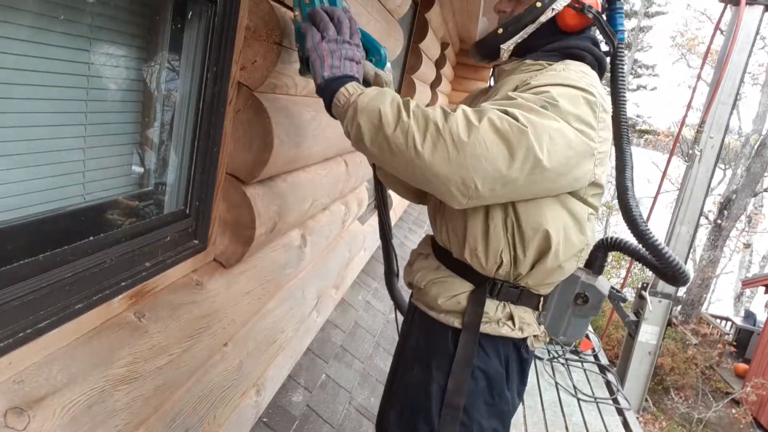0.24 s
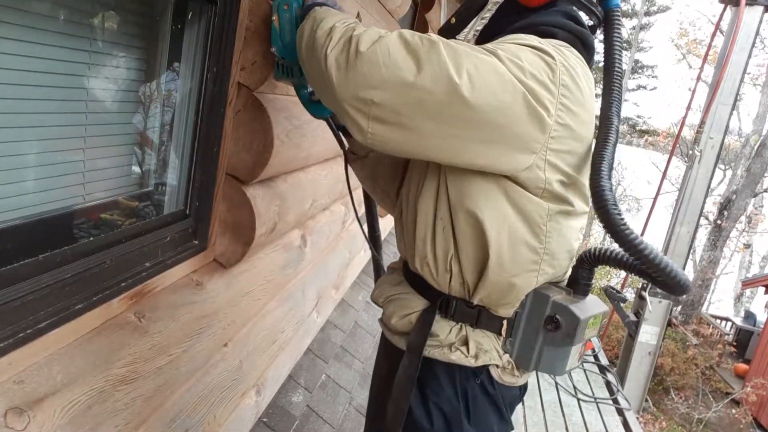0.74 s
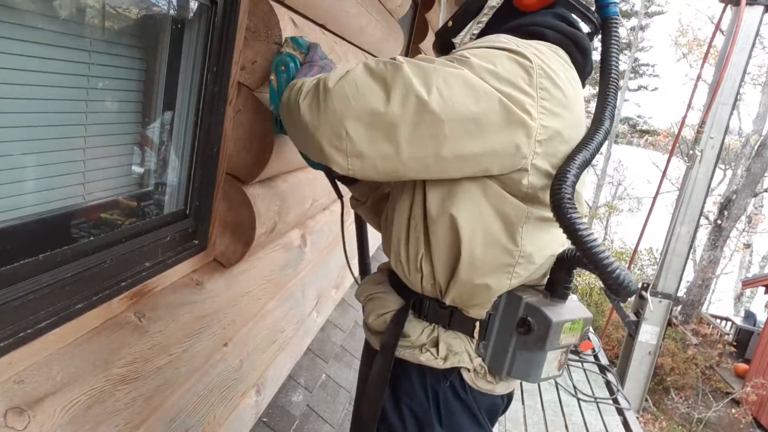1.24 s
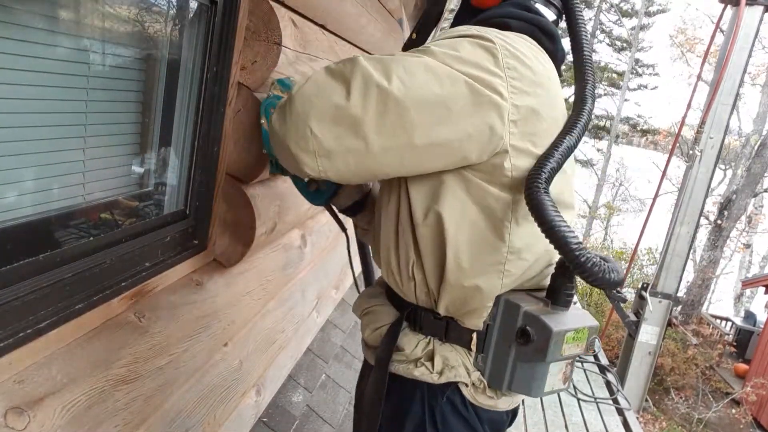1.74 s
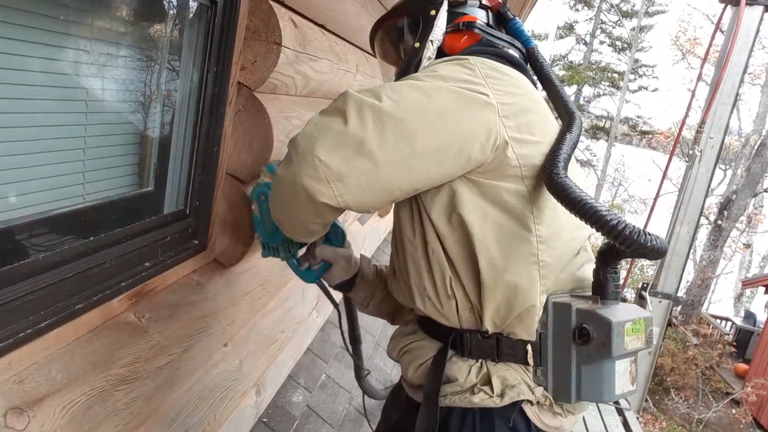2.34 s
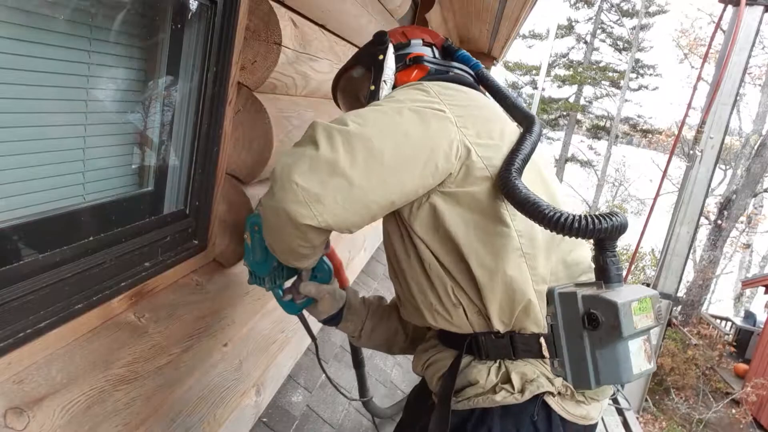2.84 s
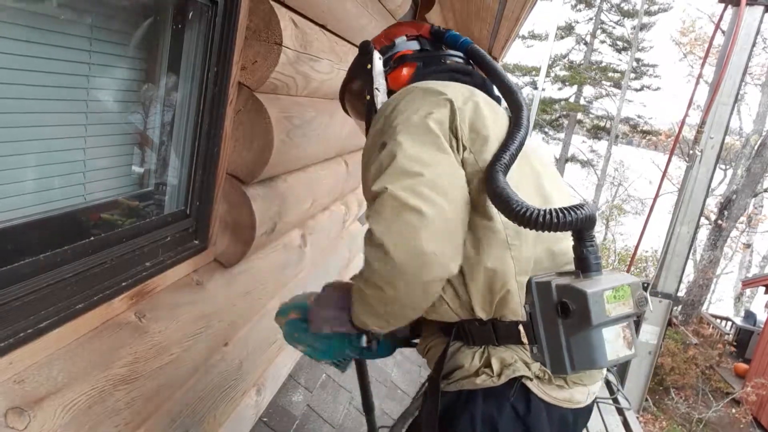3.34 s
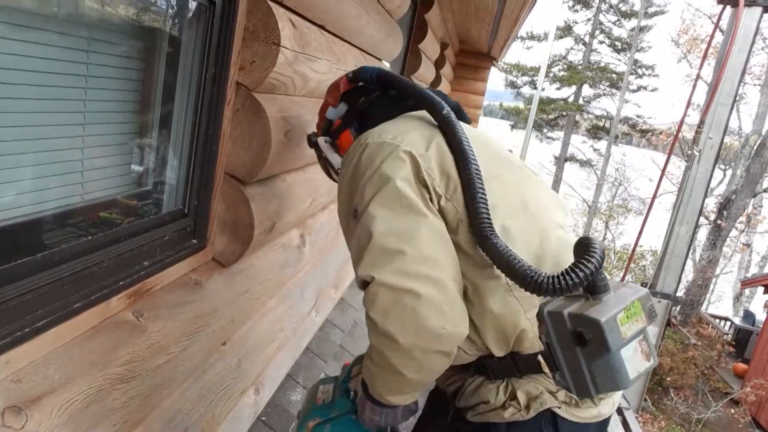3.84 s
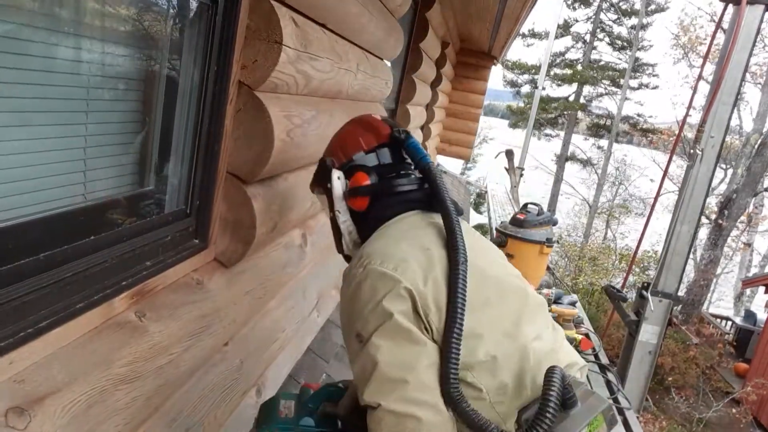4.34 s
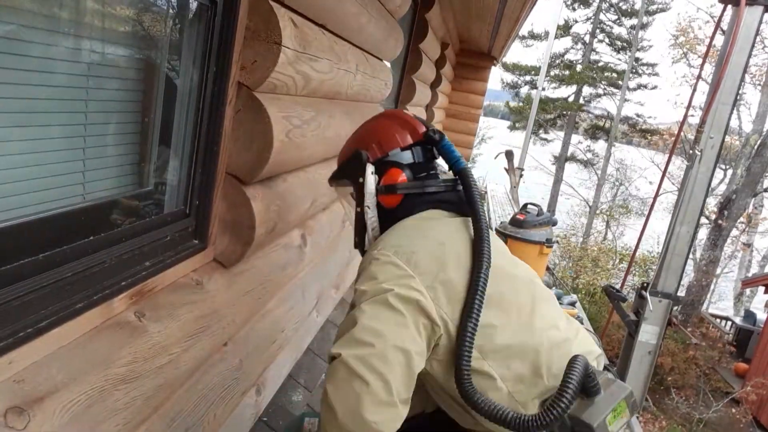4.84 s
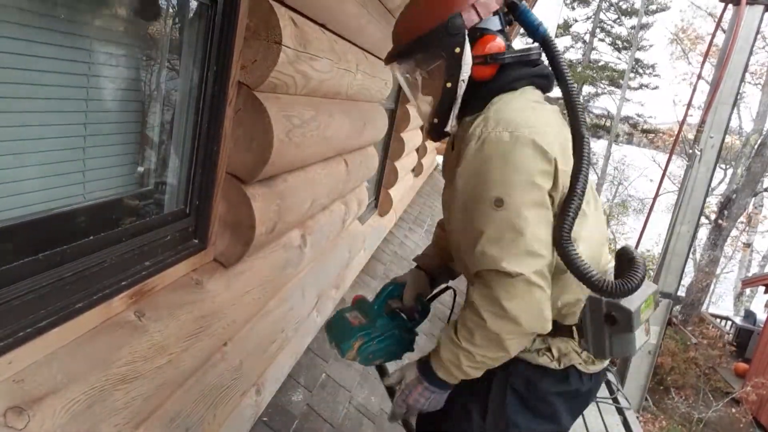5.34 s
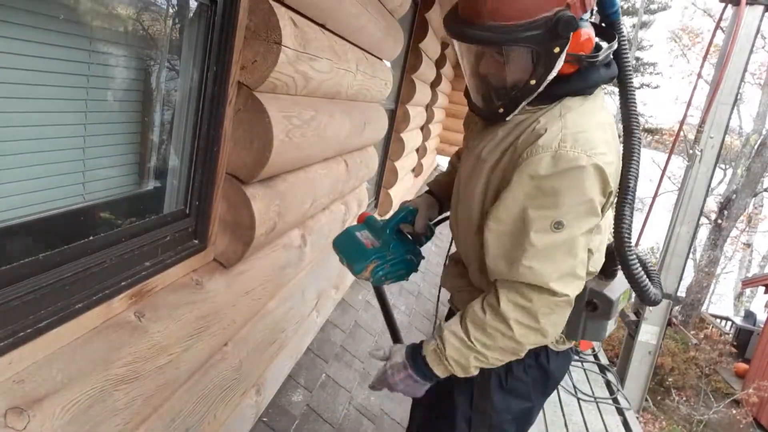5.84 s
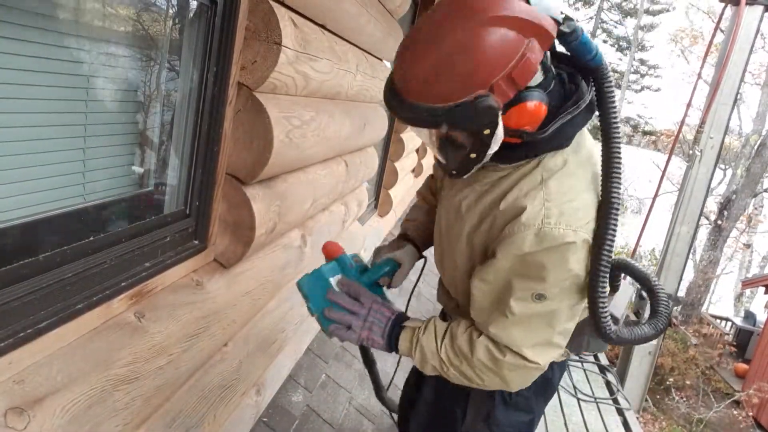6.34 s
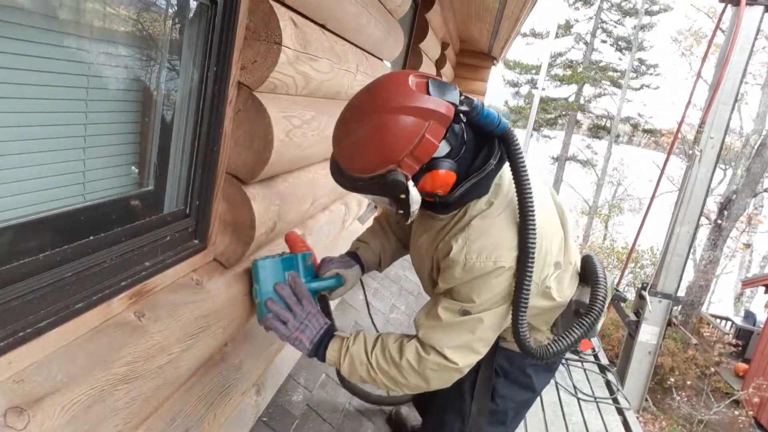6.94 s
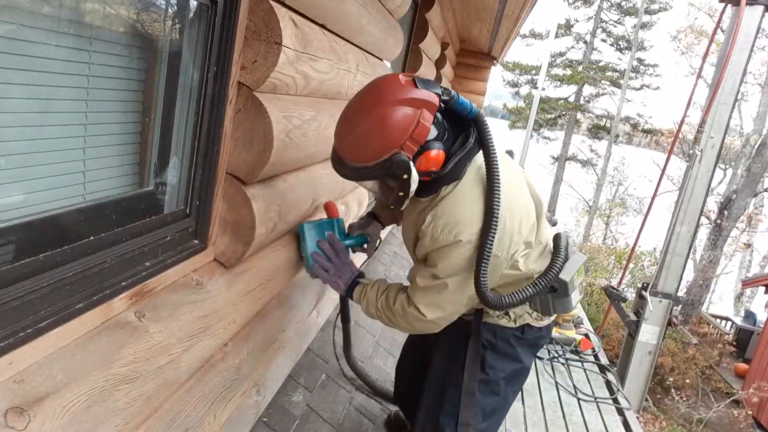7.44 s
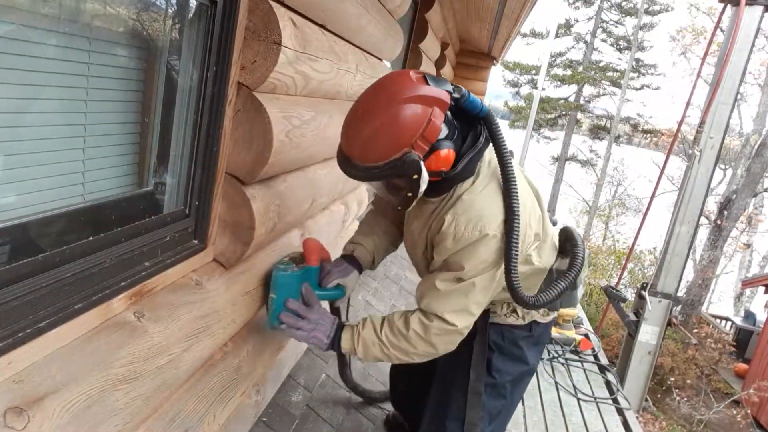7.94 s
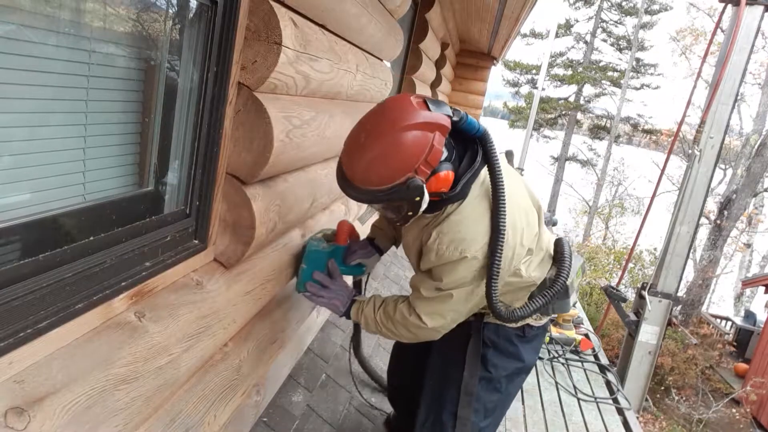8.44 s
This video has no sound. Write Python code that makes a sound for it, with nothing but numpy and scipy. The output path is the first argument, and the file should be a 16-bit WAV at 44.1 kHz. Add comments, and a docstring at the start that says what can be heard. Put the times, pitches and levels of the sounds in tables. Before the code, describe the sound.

An electric drum sander is already running at 0 s, loud and close, outdoors beside a log wall under eaves. Its fast whine and airy rush mix with a gritty rasp. Two soft, dull knocks come near 0.5 and 0.6 s, then the motor sags around 1 s, recovers by 1.6, dips near 2.1, rises about 2.6 and sinks again at 3.1 s with another low bump. Each press brings singing gears, a rough drone and a woody growl. From about 3.4 s it lifts off: pitch climbs, the rasp thins and fan air dominates, brightest around 5.5 s. Near 6.8 s it bites the wood again; the whine drops steeply to a low about 7.5 s, then wavers upward with harsh rasp, ringing guard and a gear rattle around 8 s. A faint extractor hum and airy draught persist throughout. Reflections are short and dry; it ends still sanding at about 8.7 s.

```python
"""Drum sander on a log wall

An electric drum sander works along the log wall of a cabin, outdoors under the eaves.
Tables slow its motor shaft when it is pressed on the wood: the gears whine and the drum rasps.
Lifted, it speeds up and its fan rushes. One shaft turns the fan, gears and drum together.
Behind it, a dust extractor hums with steady tones and a band of airy noise."""
import sys
import numpy as np
from scipy import signal
from scipy.fft import irfft, next_fast_len
from scipy.io import wavfile
from scipy.ndimage import uniform_filter1d

SR = 44100
rng = np.random.default_rng(int(sys.argv[2]) if len(sys.argv) > 2 else 0)


def log_audio(samples):
    """Write samples as a 16-bit WAV file to the path given in sys.argv[1]."""
    # one column per channel
    frames = np.atleast_2d(samples).T
    # limit to full scale, then quantise
    limited = np.clip(frames, -1, 1)
    pcm = np.round(limited * 32767).astype(np.int16)
    wavfile.write(sys.argv[1], SR, pcm)


N = 383654
TIME = np.arange(N) / SR
FRAME, HOP = 1024, 256  # samples in each short slice of noise, and between slices
FRAME_TIME = np.arange(N // HOP + 5) * HOP / SR
BIN_HZ = np.fft.rfftfreq(FRAME, 1 / SR)
PINION_TEETH, DRUM_TEETH, FAN_BLADES = 7, 55, 12


def amp(db):
    """Turns decibels into a gain."""
    return 10 ** (np.asarray(db) / 20)


def evened(x):
    """Scales a signal to an average (rms) strength of 1."""
    return x / np.sqrt(np.mean(x ** 2) + 1e-20)


def follow(rows, t=TIME):
    """Reads the columns of a curve table at times t, with straight lines between rows."""
    start_s, *columns = np.transpose(rows)
    return [np.interp(t, start_s, column) for column in columns]


def read(points):
    """Reads a spectrum table at every frequency bin, joined on a log-frequency axis."""
    hz, value = np.transpose(points)
    return np.interp(np.log(BIN_HZ + 1), np.log(hz), value)


def wander(rate_hz):
    """A smooth random curve of rms 1 that moves at up to about rate_hz."""
    hz = np.fft.rfftfreq(next_fast_len(N), 1 / SR)
    a, b = rng.standard_normal((2, len(hz)))
    spectrum = (a + 1j * b) / (1 + (hz / rate_hz) ** 4)
    return evened(irfft(spectrum)[:N])


def patches(frames_order, bins_order):
    """Random patches of rms 1, smoothed over time (frames) and frequency (bins)."""
    field = rng.standard_normal((len(FRAME_TIME), len(BIN_HZ)))
    over_time = uniform_filter1d(field, frames_order, 0)
    return evened(uniform_filter1d(over_time, bins_order, 1))


def ringing(hz, width_hz):
    """A resonance shaken at random, its centre following the curve hz."""
    shake = wander(width_hz) + 1j * wander(width_hz)
    return (shake * np.exp(2j * np.pi * np.cumsum(hz) / SR)).real


# how far the left microphone port leads the right, as the sander moves: start_s, lead_ms
BEARING = [(0, 0.16), (3.1, 0.18), (3.7, 0.084), (4.6, 0.12), (5.5, 0.065), (6.2, 0.16), (7.1, 0.11)]


def ports(x, share=1):
    """Sound reaches the left port first, by a share of the full lead."""
    lead_s = follow(BEARING)[0] / 1000
    return np.array([np.interp(TIME + share * lead_s, TIME, x), x])


# how alike noise is at the two microphone ports: pitch_hz, likeness (0-1)
LIKENESS = [(100, 1), (400, 0.83), (1000, 0.82), (2000, 0.76), (4000, 0.52), (10000, 0)]


def noise(colour_db, shading_db=0, ahead=0.36):
    """Coloured noise, partly alike at both ports; a share (ahead) of the alike part has no lead."""
    a, b, c, d = rng.standard_normal((4, len(FRAME_TIME), len(BIN_HZ)))
    lead_s = follow(BEARING, FRAME_TIME)[0][:, None] / 1000
    right = a + 1j * b
    link = read(LIKENESS) * (ahead + (1 - ahead) * np.exp(2j * np.pi * BIN_HZ * lead_s))
    unlike = np.sqrt(np.maximum(1 - abs(link) ** 2, 0)) * (c + 1j * d)
    left = link * right + unlike
    slices = np.array([left, right]) * amp(colour_db + shading_db)
    sound = signal.istft(slices.transpose(0, 2, 1), nperseg=FRAME, noverlap=FRAME - HOP)[1]
    return evened(sound[:, :N])


# steady tones of the dust extractor, before the screening: pitch_hz, level_db
EXTRACTOR = [(391.3, -31.5), (296.7, -45), (120.5, -63.5), (1462, -36)]
# the worker's body screens the extractor's hum: start_s, change_db
SCREEN = [(0, -3), (.55, 2), (.9, -5.5), (3, -7.5), (3.6, -5.5), (5.6, 1), (6.5, 0), (7.3, -2.5),
          (8.7, -5.5)]
# colour of the extractor's air, relative levels: pitch_hz, level_db (per Hz)
DRAUGHT = [(25.0, -37), (80.0, -15.5), (160.0, -18), (220.0, 0), (290.0, 2), (340.0, -4.5), (700.0, 8.5),
           (2000.0, -12), (8000.0, -41)]


def extractor(draught_db=-37.0, waver_db=2.0, drift=0.0015):
    """A suction motor hums on slightly drifting tones, over the noise of its moving air."""
    clock = np.cumsum(1 + drift * wander(7.1)) / SR
    hum = 0
    for hz, db in EXTRACTOR:
        hum = hum + amp(db + waver_db * wander(4.2)) * np.sin(2 * np.pi * hz * clock)
    air = amp(draught_db) * noise(read(DRAUGHT))
    return np.sqrt(2) * hum * amp(follow(SCREEN)[0]) + air


def eaves(x, wet_db=-9, t60=0.16):
    """The direct tone, then a short scatter from logs, deck and roof, fading 60 dB in t60 seconds."""
    t = TIME[:SR // 4]
    taps = rng.standard_normal((2, len(t))) * amp(-60 * t / t60)
    taps = taps / np.linalg.norm(taps[0])
    scatter = signal.fftconvolve(x[None], taps, axes=1)[:, :N]
    return (ports(x, 0.49) + amp(wet_db) * scatter) / np.hypot(1, amp(wet_db))


# echo off the log wall: start_s, delay_ms, strength (0-1)
WALL = [(0, 2.3, 0.1), (.75, 2.53, 0.36), (1.1, 1.8, 0), (1.45, 1.93, 0.3), (1.85, 1.42, .45),
        (2.15, 1.43, 0.22), (3.1, 1.28, 0.1), (6.3, 2.1, 0), (7.15, 1.78, .3), (8, 1.82, 0.34)]


def wall_db(scatter_hz=2500):
    """The wall's echo boosts and cuts the noise like a comb; round logs scatter its treble away."""
    delay_ms, strength = follow(WALL, FRAME_TIME[:, None])
    turn = np.exp(2j * np.pi * BIN_HZ * delay_ms / 1000)
    echo = turn * strength / (1 + (BIN_HZ / scatter_hz) ** 2)
    return 20 * np.log10(abs(1 + echo))


# a moving dip (or, above 0 dB, a bump) in the colour of the noise: start_s, pitch_hz, change_db
HOLLOW = [(.5, 510, -6.5), (.9, 950, -0.5), (1.9, 900, -6), (3.1, 460, 0), (3.6, 470, -8), (4.2, 510, -9),
          (4.8, 850, -5), (5.05, 550, -5), (5.9, 607, -2), (6.5, 620, 4)]


def hollow_db(width_hz=130):
    """A dip or bump that moves through the low end of the noise as the tool is swung."""
    hz, db = follow(HOLLOW, FRAME_TIME[:, None])
    return db / (1 + (2 * (BIN_HZ - hz) / width_hz) ** 2)


# hollows of the tool's housing that colour its noise: pitch_hz, width_hz, boost_db
HOUSING = [(717, 48, 7), (944, 57, 5), (1252, 71, 2.5), (1678, 21, 4.5), (1910, 140, 2.5)]


def housing_db():
    """Hollows in the tool's shell resonate and put peaks on its noise."""
    return sum(db / (1 + (2 * (BIN_HZ - hz) / width) ** 4) for hz, width, db in HOUSING)


# the tool bumps the wall: start_s (moment of the peak), level_db, pitch_hz (centre)
BUMPS = [(0.487, -39, 150), (.63, -42, 150), (3.086, -37, 191.3)]


def bumps(decay=0.0058, spread_hz=70):
    """Short, dead knocks on the heavy wall: bands of noise that swell and die in milliseconds."""
    shake = wander(spread_hz) + 1j * wander(spread_hz)
    knocks = 0
    for start_s, db, hz in BUMPS:
        age = np.maximum(TIME - start_s + decay, 0) / decay
        knock = (shake * np.exp(2j * np.pi * hz * TIME)).real
        knocks = knocks + amp(db) * age * np.exp(1 - age) * knock
    return knocks


# colour of the cooling air, relative levels: pitch_hz, level_db (per Hz)
AIR = [(100.0, -52), (250.0, -13.5), (500.0, -3.5), (780.0, -4.5), (1050.0, 2), (2000.0, 0.1),
       (3200.0, -0.5), (4500.0, -0.5), (5400.0, -3.5), (7200.0, -4), (8400.0, -12.5), (11500.0, -13),
       (13500.0, -15), (15800.0, -21)]
# rush of the air as the vents turn toward and away: start_s, level_db
VENTS = [(0, -16.5), (.6, -14.5), (1.25, -21), (1.6, -18.5), (2.8, -19.5), (3.1, -22.5), (3.5, -18),
         (4.1, -18), (4.45, -14), (5, -16.5), (5.55, -12), (6.05, -13.5), (6.8, -17), (7.55, -21.5),
         (8.15, -21), (8.7, -23)]


def cooling_air(patchy_db=3.5, gust_db=0.7):
    """The fan's rush of air, coloured by the housing and the wall."""
    shading_db = wall_db() + hollow_db() + patchy_db * patches(frames_order=30, bins_order=3)
    level_db = follow(VENTS)[0] + gust_db * wander(44)
    return amp(level_db) * noise(read(AIR) + housing_db(), shading_db)


# fan blade tone as the vents turn toward and away: start_s, level_db
BLADES = [(0, -29), (.45, -24), (.61, -32), (.73, -23), (1.1, -39), (1.5, -26), (2.1, -39), (2.4, -31),
          (3.1, -34), (4.3, -27), (5.4, -35), (5.95, -26), (7.2, -39), (8.7, -33)]


def fan(turns, second_db=-27, fade_db=1.5, fade_hz=9, flutter_db=3):
    """Each passing blade pushes the air, giving a tone and its octave that fade and flutter."""
    phase = 2 * np.pi * FAN_BLADES * turns
    tone = np.sin(phase) + amp(second_db) * np.sin(2 * phase)
    level_db = follow(BLADES)[0] + fade_db * wander(fade_hz) + flutter_db * wander(23)
    return np.sqrt(2) * tone * amp(level_db)


# motor shaft in three presses, a free run, then a long press: start_s, speed (turns per second)
# these speeds are smoothed before use
SPEED = [(0, 379), (.6, 393), (.79, 374), (.97, 323), (1.18, 312), (1.43, 346), (1.64, 352), (2.01, 296),
         (2.21, 295), (2.45, 337), (2.72, 339), (2.91, 298), (3.07, 280), (3.32, 335), (3.81, 373),
         (4.49, 390.5), (5.6, 398.4), (6.83, 399.5), (7.07, 355.5), (7.45, 279), (7.68, 298), (8.15, 315.5),
         (8.41, 294), (8.7, 312.5)]
INERTIA_S = .14  # the rotor's mass rounds every change of speed


def shaft_hz(t=TIME):
    """Turns per second of the motor at times t, smoothed by the rotor's mass."""
    smooth = uniform_filter1d(follow(SPEED)[0], max(1, int(INERTIA_S * SR)), mode="nearest")
    return np.interp(t, TIME, smooth)


# rattle of the gear case: start_s, pitch_hz, level_db
CASE = [(1.7, 1992, -46), (2.2, 2006, -30), (3.6, 2050, -44), (7.7, 2050, -57), (8.05, 2102, -18),
        (8.7, 2010, -34)]


def gear_case(width_hz=70):
    """The gear case rattles in a fuzzy band beside the mesh tone."""
    hz, db = follow(CASE)
    return amp(db) * ringing(hz, width_hz)


def squeal(mesh_phase, order=6, peak_hz=12200, width_hz=600, peak_db=-42):
    """A high harmonic of the gears sings out as it slides through a narrow resonance."""
    off = 2 * (order * PINION_TEETH * shaft_hz() - peak_hz) / width_hz
    return amp(peak_db) / (1 + off ** 2) * np.sin(order * mesh_phase)


# gears sing under load, and their case beams the tones differently as it turns
# columns, before fading and flutter: start_s, mesh_level_db, octave_level_db
FACING = [(.55, -33, -42), (.68, -23, -34), (1, -23, -32), (1.19, -22, -24), (1.42, -34, -44),
          (1.65, -21.5, -28), (2.05, -23, -19.5), (2.43, -27, -38), (2.62, -18.5, -38), (2.79, -22.5, -28),
          (2.96, -26, -27), (3.3, -36, -42), (6.78, -38, -42), (6.94, -20.5, -42), (7.21, -21, -28),
          (7.55, -33, -28), (7.88, -22, -25), (8.25, -20.5, -23), (8.46, -28, -29.5), (8.7, -21, -24.5)]


def gears(turns, drum_turns, fade_db=1.0, runout=0.15, swing=0.074, rattle=0.15, flutter_db=1.5):
    """Teeth mesh under load; the slightly eccentric drum wheel sways their pitch and force."""
    drum = 2 * np.pi * drum_turns
    phase = 2 * np.pi * PINION_TEETH * turns + swing * np.sin(drum)
    levels_db = follow(FACING)
    tone = squeal(phase)
    # the third harmonic follows the level of the mesh tone
    tone += amp(levels_db[0]) * squeal(phase, order=3, peak_hz=7260, peak_db=-5.5)
    for harmonic, db in enumerate(levels_db, 1):
        wave = np.sin(harmonic * (phase + rattle * wander(78)))
        tone += amp(db + fade_db * wander(4.5)) * wave
    return np.sqrt(2) * tone * (1 + runout * np.cos(drum)) * amp(flutter_db * wander(94))


# growl of the log, whose resonance shifts with the place under the drum: start_s, pitch_hz, level_db
GROWL = [(0, 720, -24), (.4, 735, -27), (.6, 599.6, -27.5), (1.2, 653.8, -28.5), (1.42, 531, -39),
         (1.75, 535.6, -26), (2.05, 641.3, -26.5), (3.03, 662, -25.5), (3.6, 619.7, -46), (8.1, 616, -39.5)]


def growl(drum_turns, width_hz=75, beat=0.18):
    """The log's resonance under the drum, shaken harder once in every turn."""
    hz, db = follow(GROWL)
    shake = 1 + beat * np.cos(2 * np.pi * drum_turns)
    return amp(db) * evened(ringing(hz, width_hz) * shake)


# uneven abrasive comes round every turn: order (multiple of the drum rate), level_db (relative)
DRUM_ORDERS = [(12, 10), (13, 6.5), (17, -9), (18, -4)]
# drone of the drum, loudest when it sits flat on a log, before a trim: start_s, level_db
DRONE = [(0, -23.5), (1.2, -34), (1.65, -20.5), (2.1, -34), (2.65, -23.5), (3.8, -49), (6, -38), (7, -23),
         (7.6, -38), (8.7, -34)]
# ring of the guard, shifting with grip and press, before a trim: start_s, pitch_hz, level_db
RING = [(0, 1220, -30), (.7, 1217, -20.5), (1.1, 1102, -28), (1.7, 1048, -22.5), (2.2, 1210, -31.5),
        (5.1, 887.7, -43), (5.5, 908, -30), (6.4, 955, -31), (6.8, 1120, -24.5), (7.5, 1168, -25),
        (8.1, 1067, -20), (8.7, 1082, -27)]


def drone(drum_turns, drone_db=-3, ring_db=-3, ring_width_hz=50, blur=1.0, flutter_db=2):
    """The drum's high spots beat on the wood in a rough chord, and its guard rings."""
    chord = 0
    for order, db in DRUM_ORDERS:
        phase = 2 * np.pi * order * drum_turns + blur * wander(26.5)
        chord = chord + amp(db + flutter_db * wander(3.9)) * np.sin(phase)
    ring_hz, guard_db = follow(RING)
    ring = amp(ring_db + guard_db) * ringing(ring_hz, ring_width_hz)
    return amp(drone_db + follow(DRONE)[0]) * evened(chord) + ring


# colour of the abrasive on the log, relative levels: pitch_hz, level_db (per Hz)
RASP = [(60, -43), (150, -37.5), (230, -19), (330, -8.5), (540, -4.5), (900, -7.5), (1400, -11),
        (2000, -1.5), (2900, -16), (4200, -9.5), (8000, -32), (11000, -19.5), (15000, -29.5)]


def grit(drum_turns, count=1024):
    """The same grains come round with every turn, so part of the rasp repeats as a coarse buzz."""
    grains = rng.standard_normal(count)
    scrape = np.interp(drum_turns % 1, np.arange(count) / count, grains)
    slices = signal.stft(scrape, nperseg=FRAME)[2] * amp(read(RASP) + housing_db())[:, None]
    return ports(evened(signal.istft(slices, nperseg=FRAME)[1][:N]))


# rasp of the drum on the log, before a trim: start_s, level_db
BITE = [(0, -16), (1.2, -17), (2.2, -18), (2.6, -14), (3.1, -17), (3.6, -26), (4.3, -28), (5.6, -30),
        (6.1, -23.5), (6.8, -16), (7.55, -21.5), (8.15, -17), (8.7, -23)]
# resonances of the drum and its guard, relative levels: pitch_hz, width_hz, level_db
CHATTER = [(891, 136, 1), (1130, 156, -4)]
# chatter of the drum guard, before a trim: start_s, level_db
GUARD = [(0, -18.5), (1.15, -31), (1.6, -28), (2.7, -24.5), (3.4, -23.5), (4.1, -30), (6, -28), (6.7, -19),
         (7.5, -24.5), (8.1, -18)]


def sanding(drum_turns, rasp_db=-2.0, chatter_db=-2, beat=0.16, grab_db=1.64, patchy_db=2, buzz_db=-2):
    """Grit scrapes the log and shakes the guard, biting harder once in each turn of the drum."""
    log_db, guard_db = follow(BITE)[0], follow(GUARD)[0]
    shading_db = wall_db() + hollow_db()
    patched_db = shading_db + patchy_db * patches(frames_order=30, bins_order=2)
    rasp = noise(read(RASP) + housing_db(), patched_db)
    rasp = evened(rasp + amp(buzz_db) * grit(drum_turns))
    guard = sum(amp(db) / (1 + (2 * (BIN_HZ - hz) / width) ** 4) for hz, width, db in CHATTER)
    chatter = noise(20 * np.log10(guard), shading_db)
    bite = (1 + beat * np.cos(2 * np.pi * drum_turns)) * amp(grab_db * wander(17.4))
    return bite * (amp(rasp_db + log_db) * rasp + amp(chatter_db + guard_db) * chatter)


def scene(unsteady=0.0007, left_db=0.37):
    """One shaft drives the fan, the gears and the drum; the left side is set slightly louder."""
    turns = np.cumsum(shaft_hz() * (1 + unsteady * wander(22.9))) / SR
    drum_turns = turns * PINION_TEETH / DRUM_TEETH
    motor = eaves(gears(turns, drum_turns) + fan(turns) + gear_case()) + cooling_air()
    wood = sanding(drum_turns) + ports(drone(drum_turns) + growl(drum_turns)) + bumps()
    return (extractor() + motor + wood) * amp([[left_db], [-left_db]])


EDGE_HZ = 15800  # upper limit of the recorder's band


def record(dry):
    """The recorder's band limit: a steep filter removes the highest treble."""
    lowpass = signal.firwin(801, EDGE_HZ, window=("kaiser", 9), fs=SR)
    return signal.oaconvolve(dry, lowpass[None], "same", axes=1)


dry = scene()
out = record(dry)
log_audio(out)
```